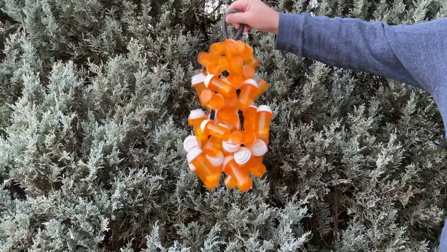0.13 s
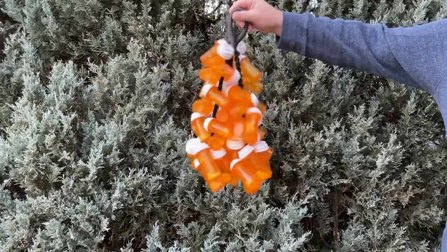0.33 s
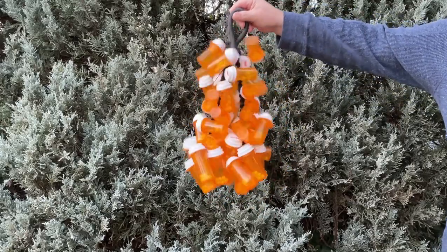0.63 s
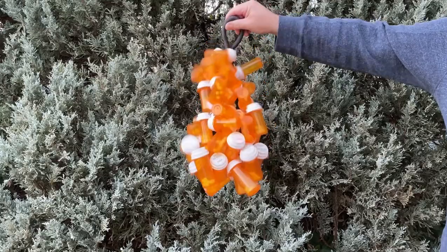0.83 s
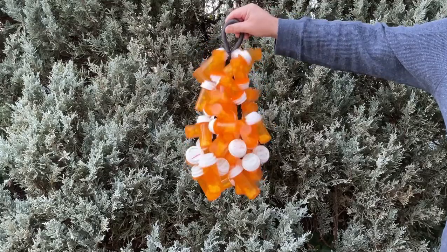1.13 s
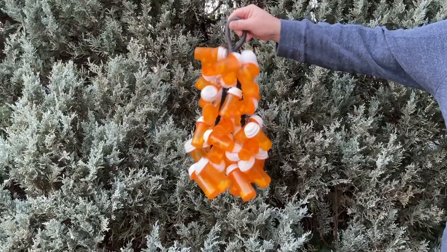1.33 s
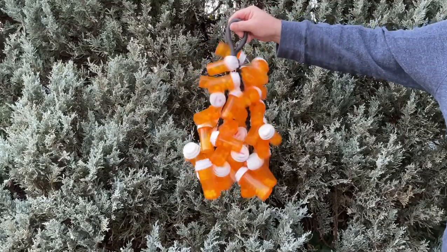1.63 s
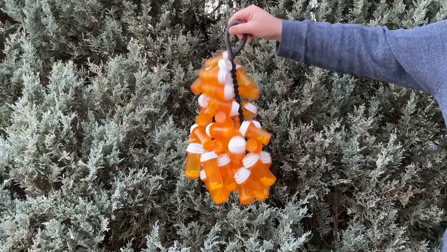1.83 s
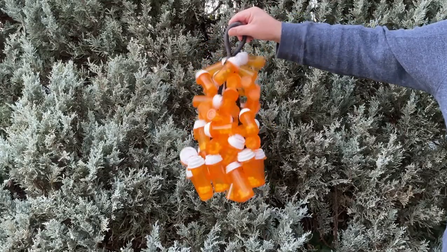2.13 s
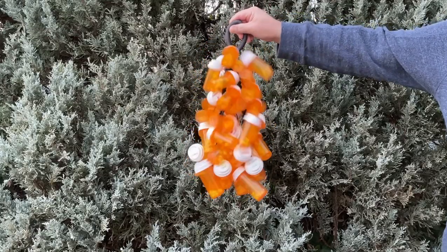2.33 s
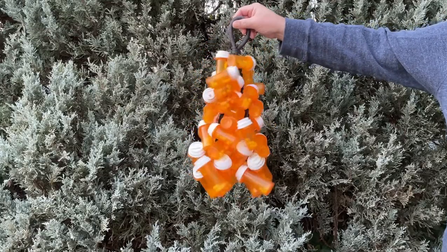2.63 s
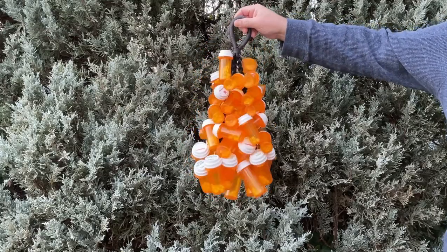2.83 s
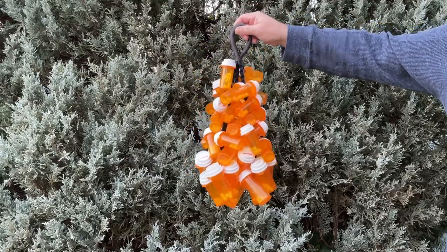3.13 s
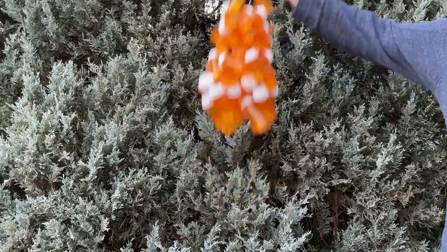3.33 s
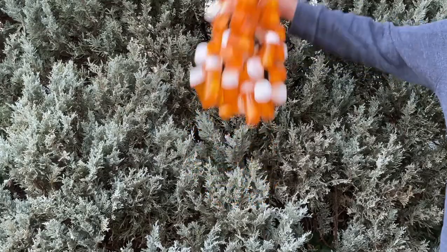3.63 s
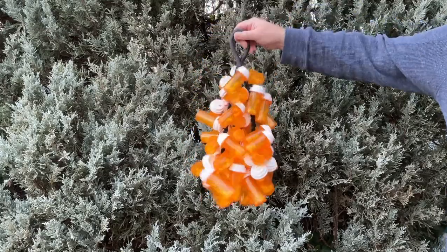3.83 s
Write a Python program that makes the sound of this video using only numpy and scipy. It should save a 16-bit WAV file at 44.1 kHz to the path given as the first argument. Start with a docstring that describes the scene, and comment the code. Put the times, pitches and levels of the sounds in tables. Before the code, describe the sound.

A cluster of small plastic bottles rattles from the start, a dense, rain-like clacking with beads pinging inside. At about 2.8 seconds it dies away, leaving a few faint, lone clicks. From 3.6 seconds the cluster drops in one rush of clatter, loudest near 3.8 seconds and fading by 4. A very faint hush of outdoor air lies underneath throughout.

```python
"""Small plastic bottles are twisted to and fro in a cluster, by hand and outdoors. The bottles clack
together in a dense rain and the beads inside ping. The cluster settles to a few lone clicks, is lifted,
and drops in one loud rush. Ground and hedge throw short echoes back, and a faint hush of open air,
with one breath of wind, lies under it all."""
import sys
import numpy as np
from scipy import signal
from scipy.io import wavfile

SR = 44100
rng = np.random.default_rng(int(sys.argv[2]) if len(sys.argv) > 2 else 0)


def dump(signal):
    """Clip the signal to [-1, 1] and save it as 16-bit WAV at the path in sys.argv[1]."""
    limited = np.clip(np.atleast_2d(signal).T, -1, 1)
    pcm = np.round(limited * 32767).astype(np.int16)
    wavfile.write(sys.argv[1], SR, pcm)


N = 176400

# How hard the bottles knock together. Each row: time in seconds, level in dB.
CLATTER_LEVELS = [(0.0, -54), (0.3, -50.5), (0.34, -52.5), (0.4, -50), (0.86, -52.5), (0.88, -48.5),
                  (0.94, -52.5), (1.0, -51.5), (1.75, -51), (1.82, -55.5), (1.86, -48.5), (1.91, -54),
                  (2.04, -51), (2.11, -54), (2.17, -53), (2.18, -45), (2.19, -49), (2.37, -52), (2.51, -54),
                  (2.56, -52), (2.73, -56.5), (2.74, -56.5), (2.93, -74), (2.95, -80), (3.02, -84),
                  (3.13, -93), (3.16, -81), (3.19, -70.5), (3.21, -100), (3.45, -97), (3.52, -76.5),
                  (3.6, -62), (3.66, -53.5), (3.695, -54.5), (3.715, -45.5), (3.735, -44.5), (3.745, -38.5),
                  (3.785, -38), (3.805, -41), (3.83, -45.5), (3.86, -51), (3.89, -53), (3.95, -59.5),
                  (4.0, -62)]
# The tone of a clack. Each row: frequency in Hz, relative level in dB.
CLACK_TONE = [(100, -32.5), (300, -20.5), (550, -18.5), (800, -11.5), (1100, -12.5), (1800, -9.5),
              (2500, -7), (3500, -4), (5600, -6), (7500, -11), (10300, -14.5), (12500, -22.5),
              (14200, -24.5), (15600, -40)]
BUSY_DB = -51  # the clatter level that divides gentle shaking from hard
TIME = np.arange(N) / SR
HIT_TIME = np.arange(1024) / SR  # seconds within one hit


def gain_of(db):
    """Turns decibels into a number to multiply a sound by."""
    return 10 ** (np.asarray(db) / 20)


def fade(t, t60):
    """A dying sound: it drops by 60 dB every t60 seconds."""
    return gain_of(-60 * t / t60)


def unit_level(x):
    """Scales a signal to an average (rms) level of 1."""
    return x / np.sqrt(np.mean(x ** 2) + 1e-20)


def value_at(table, hz):
    """Looks up a frequency in a table, sliding between the rows by musical pitch."""
    row_hz, values = np.transpose(table)
    return np.interp(np.log(hz + 1), np.log(row_hz + 1), values)


def tone_gains(tone):
    """Turns a tone table into gains at evenly spaced frequencies."""
    return gain_of(value_at(tone, np.fft.rfftfreq(4096, 1 / SR)))


def with_tone(x, tone):
    """Filters a sound to the given tone, with no ringing ahead of a hit."""
    log_gain = np.log(tone_gains(tone))
    mirrored = np.concatenate([log_gain, log_gain[-2:0:-1]])
    response = np.exp(np.conj(signal.hilbert(mirrored)))  # minimum phase: as early as possible
    taps = np.fft.ifft(response).real[:2048]
    return signal.oaconvolve(x, taps)[:len(x)]


def shower(levels, sounds, db, per_s, spread_db=2.5, busy_db=BUSY_DB):
    """A rain of random hits: per_s a second at busy_db, more when louder, fewer when quieter."""
    level_db = np.interp(TIME, *np.transpose(levels))
    rate = per_s * gain_of(.35 * (level_db - busy_db))
    size = gain_of(spread_db * np.minimum(rng.exponential(1, N), 5)) * rng.choice([-1., 1.], N)
    struck = rng.random(N) < rate / SR
    hits = unit_level(size) * struck * gain_of(level_db + db) * np.sqrt(SR / rate)
    which = rng.integers(0, len(sounds), N)
    return sum(signal.oaconvolve(hits * (which == k), sound / np.linalg.norm(sound))[:N]
               for k, sound in enumerate(sounds))


def clack(count=24):
    """Two bottle walls meet: a tick, and the walls ring briefly at many random pitches."""
    # How long a wall rings. Each row: frequency in Hz, seconds to fade by 60 dB.
    wall_ring_times = [(300, 0.024), (2000, 0.01), (5000, 0.024), (12000, 0.0017)]
    place, size, phase = rng.random((count, 3)).T
    hz = 300 + 15000 * ((np.arange(count) + place) / count) ** 2
    t60 = value_at(wall_ring_times, hz)
    strength = size * np.sqrt(np.gradient(hz) / SR * 0.012 / t60)
    waves = np.cos(2 * np.pi * (hz[:, None] * HIT_TIME + phase[:, None]))
    sound = (strength[:, None] * fade(HIT_TIME, t60[:, None]) * waves).sum(0)
    sound[0] += 1.5  # the tick
    return sound / np.linalg.norm(sound)


def crash():
    """Whole bottles collide and chatter: a quick run of clacks dying away."""
    n = len(HIT_TIME)
    run = rng.standard_normal(n) * (rng.random(n) < .06) * fade(HIT_TIME, t60=0.013)
    run[0] += 1.5  # the first contact
    return signal.oaconvolve(run, clack())[:n]


def bottles():
    """The dense clatter of walls and caps, brighter when shaken hard, duller when gentle."""
    clacks = shower(CLATTER_LEVELS, [clack() for _ in range(32)], db=4, per_s=2200)
    crashes = shower(CLATTER_LEVELS, [crash() for _ in range(10)], db=-5.5, per_s=100, spread_db=2.67)
    tone_rms = np.sqrt(np.mean(tone_gains(CLACK_TONE) ** 2))
    clatter = with_tone(clacks + crashes, CLACK_TONE) / tone_rms
    lows, lows_and_mids = (signal.sosfiltfilt(signal.butter(2, hz, fs=SR, output="sos"), clatter)
                           for hz in (1530, 5300))
    over_db = np.interp(TIME, *np.transpose(CLATTER_LEVELS)) - BUSY_DB
    hard_cut = 1 - gain_of(-0.4 * np.maximum(over_db, 0))
    gentle_boost = gain_of(-0.17 * np.minimum(over_db, 0)) - 1
    return clatter - hard_cut * lows + gentle_boost * lows_and_mids


def ring(hz, rise_s, t60):
    """One pure tone that starts softly and dies away."""
    shape = (1 - np.exp(-(HIT_TIME / rise_s) ** 2)) * fade(HIT_TIME, t60)
    return shape / shape.max() * np.sin(2 * np.pi * hz * HIT_TIME)


def pings(hz, spread, t60):
    """A set of bead pings around one pitch, each with its own ring time."""
    offsets = rng.standard_normal((14, 2))
    offsets -= offsets.mean(0)
    return [ring(hz * (1 + spread * pitch), rise_s=.0008, t60=t60 * np.exp(0.33 * length))
            for pitch, length in offsets]


def beads():
    """Beads set each bottle's air and base ringing. Larger bottles ping lower, whenever they knock."""
    # How hard the beads tumble. Each row: time in seconds, level in dB.
    tumble_levels = [(0.0, -42), (0.06, -62), (0.07, -50), (0.08, -73), (0.11, -38), (0.13, -42.5),
                     (0.34, -59), (0.49, -42), (0.51, -60), (0.53, -48), (0.54, -47), (0.71, -52),
                     (0.74, -58), (0.75, -46), (0.97, -50), (1.09, -43), (1.35, -51), (1.39, -40.5),
                     (1.42, -44), (1.43, -49), (1.44, -49), (1.62, -53), (1.65, -42.5), (1.82, -48.5),
                     (2.32, -50.5), (2.33, -40), (2.5, -56), (2.69, -48.5), (2.78, -50), (2.95, -75),
                     (3.0, -77), (3.05, -68), (3.12, -94), (3.17, -76), (3.21, -84), (3.26, -98),
                     (3.36, -95), (3.45, -85), (3.52, -84), (3.572, -69), (3.634, -51), (3.694, -64),
                     (3.72, -53), (3.788, -39.5), (3.88, -44.5), (3.976, -66), (4.0, -60)]
    high_pings = pings(hz=4740, spread=.04, t60=.007)
    small = shower(tumble_levels, high_pings, db=-3.5, per_s=900, busy_db=BUSY_DB + 4.5)
    low_pings = pings(hz=4206, spread=0.045, t60=0.0082)
    large = shower(CLATTER_LEVELS, low_pings, db=-2.5, per_s=600)
    return small + large


def echoes(rattle):
    """Six short sprays of echoes from ground and hedge, fading in and out as the cluster turns."""
    t = np.arange(4096) / SR
    out = 0
    for k in range(6):
        tail = rng.standard_normal(len(t)) * (rng.random(len(t)) < .1) * fade(t, t60=0.085)
        tail *= np.clip(t / 0.0035, 0, 1) ** 2  # builds up over 3.5 ms
        facing = np.cos(np.pi * (5 * TIME + k / 6)) ** 3 / np.sqrt(15 / 8)
        out = out + signal.oaconvolve(rattle * facing, tail / np.linalg.norm(tail))[:N]
    return out


def air():
    """A soft outdoor hush that swells slowly. One breath of wind lifts it."""
    # The tone of the hush. Each row: frequency in Hz, relative level in dB.
    air_tone = [(18, -35), (40, 0), (120, 2.5), (300, -3.5), (900, -6.5), (2000, -9.5), (4400, -31),
                (7000, -27.5), (12000, -22), (15500, -25)]
    swells = sum(np.sin(2 * np.pi * (hz * TIME + rng.random())) / np.sqrt(hz)
                 for hz in np.geomspace(.3, 6, 16))
    swell_db = 1.5 * unit_level(swells)
    breath_db = 13 * np.exp(-((TIME - 1.62) / .06) ** 2)  # strongest at 1.62 s
    hush = unit_level(with_tone(rng.standard_normal(N), air_tone))
    return gain_of(-79.5 + swell_db + breath_db) * hush


def knocks():
    """Single hits that stand out: each is a ring at its own pitch plus a sharp click."""
    # The single hits. Each row: start in seconds, level in dB, pitch in Hz,
    # click level compared with the ring in dB, seconds for the ring to fade by 60 dB.
    single_hits = [(0.046, -31, 4050, -8, 0.009), (0.0672, -29, 4660, -7, 0.009),
                   (0.0992, -25, 4770, 5, 0.01), (0.1034, -27, 4930, -18, 0.0076),
                   (0.1093, -28, 4650, -10, 0.01), (0.1555, -22.5, 4740, -5, 0.0058),
                   (0.189, -30.5, 4780, -8, 0.012), (0.2458, -29, 4560, -1, 0.0078),
                   (0.2774, -27, 4080, -4, 0.006), (0.2842, -24.5, 4130, -3, 0.0063),
                   (0.4404, -27.5, 4550, -4, 0.0071), (0.4783, -30, 4900, -14, 0.009),
                   (0.5322, -29.5, 4840, -7, 0.013), (0.5896, -27.5, 4880, 8, 0.009),
                   (0.6064, -26, 4540, 11, 0.009), (0.6664, -39, 4110, -1, 0.009),
                   (0.7003, -30, 4460, 4, 0.011), (0.7467, -28, 4760, 1, 0.009),
                   (0.7649, -28, 4780, 2, 0.009), (0.8786, -32, 4350, 7, 0.009),
                   (0.9497, -28.5, 3590, 8, 0.016), (1.004, -28, 4430, -1, 0.009),
                   (1.052, -29.5, 4660, -6, 0.0079), (1.0794, -29, 4830, -8, 0.013),
                   (1.213, -36, 4250, 6, 0.009), (1.2204, -27, 3800, 10, 0.0098),
                   (1.2386, -22.5, 3650, -2.5, 0.017), (1.3843, -26.5, 4620, 4, 0.013),
                   (1.4261, -23, 4700, -1, 0.01), (1.5394, -28, 3580, 3, 0.013),
                   (1.6402, -22.5, 4540, 6, 0.009), (1.709, -28, 4920, -4, 0.013),
                   (1.8199, -30, 2860, -1, 0.011), (1.8542, -38, 4160, -5, 0.0098),
                   (1.8992, -32, 4400, -8, 0.0082), (2.157, -30, 4500, 3, 0.0065),
                   (2.3324, -40, 4600, -6, 0.009), (2.4019, -28.5, 4740, -9, 0.0097),
                   (2.6474, -29.5, 4840, 2, 0.009), (3.0091, -60, 4680, -1, 0.009),
                   (3.0354, -53, 4800, -5, 0.009), (3.049, -52, 4200, -10, 0.0076),
                   (3.0593, -47, 4080, -9, 0.0041), (3.104, -54, 4330, 11, 0.009),
                   (3.1402, -43.5, 1920, 3, 0.0068), (3.158, -52, 4670, -1, 0.0083),
                   (3.161, -52, 4380, 4, 0.009), (3.1792, -52, 4850, 7, 0.009),
                   (3.1815, -50, 5300, 6, 0.009), (3.1846, -54, 4550, -1, 0.009),
                   (3.237, -49, 4180, 6, 0.012), (3.3764, -60.5, 4530, 2, 0.007),
                   (3.416, -64, 4220, -1, 0.009), (3.4734, -59, 2990, -1, 0.0083),
                   (3.4975, -67, 4660, -4, 0.0082), (3.5156, -49, 4170, -3, 0.011),
                   (3.5314, -48, 4570, 1, 0.009), (3.557, -47, 2680, 3, 0.009),
                   (3.7214, -22, 5060, -2, 0.01), (3.7442, -23, 4030, 12, 0.0059),
                   (3.777, -16.5, 3260, -1, 0.0064), (3.7864, -25, 4570, 9, 0.0069),
                   (3.9644, -36, 4890, -6, 0.009)]
    out = np.zeros(N + len(HIT_TIME))
    for start_s, db, hz, click_db, t60 in single_hits:
        click = with_tone(clack(), CLACK_TONE)
        click_gain = gain_of(click_db)
        hit = ring(hz, rise_s=.05 * t60, t60=t60) + click_gain * click / abs(click).max()
        out[round(start_s * SR):][:len(hit)] += gain_of(db) * hit / (1 + click_gain)
    return out[:N]


def scene():
    """The rattling bottles, their echoes and the air, in one channel."""
    rattle = bottles() + beads() + knocks()
    return (rattle + gain_of(-11.5) * echoes(rattle) + air())[None]


def record(dry):
    """Cuts away the highest treble, above 15700 Hz."""
    low_pass = signal.firwin(511, 15700, window=("kaiser", 9), fs=SR)
    return signal.oaconvolve(dry, low_pass[None], "same")


dry = scene()
out = record(dry)
dump(out)
```